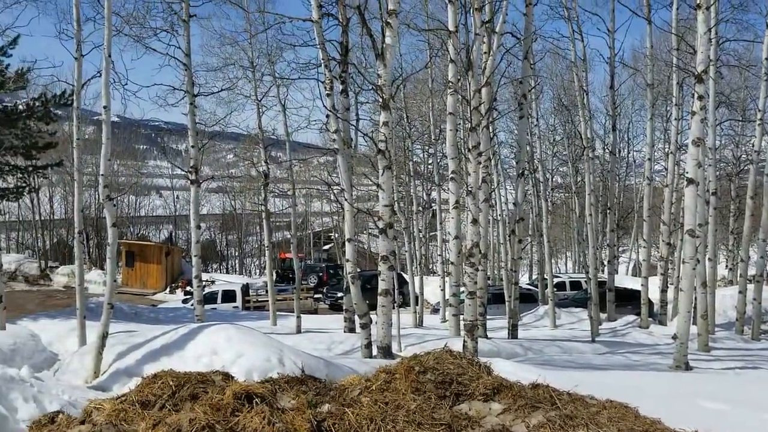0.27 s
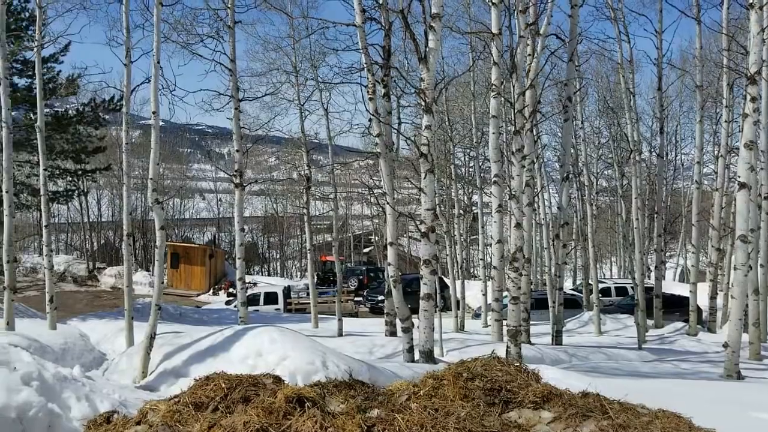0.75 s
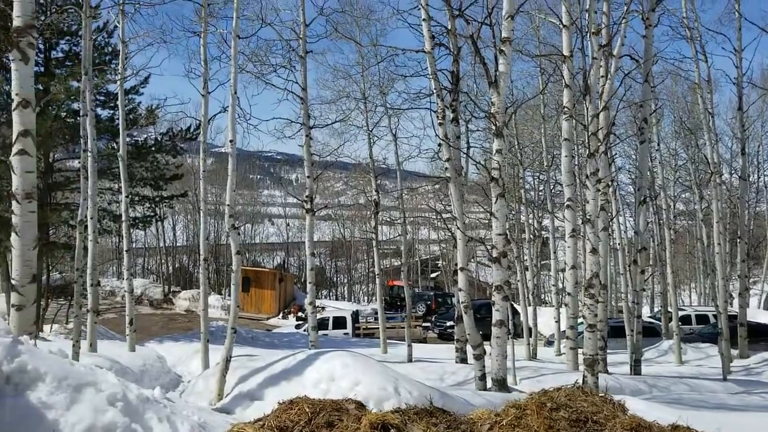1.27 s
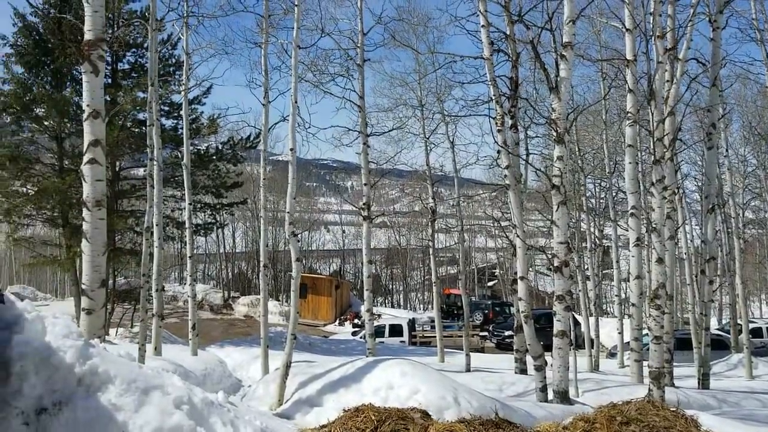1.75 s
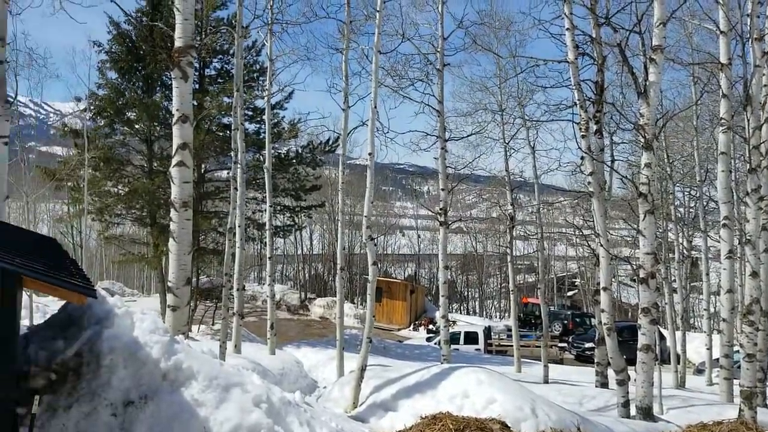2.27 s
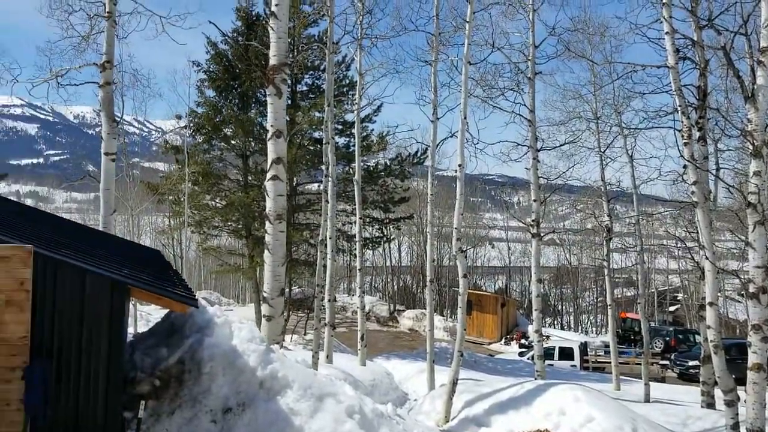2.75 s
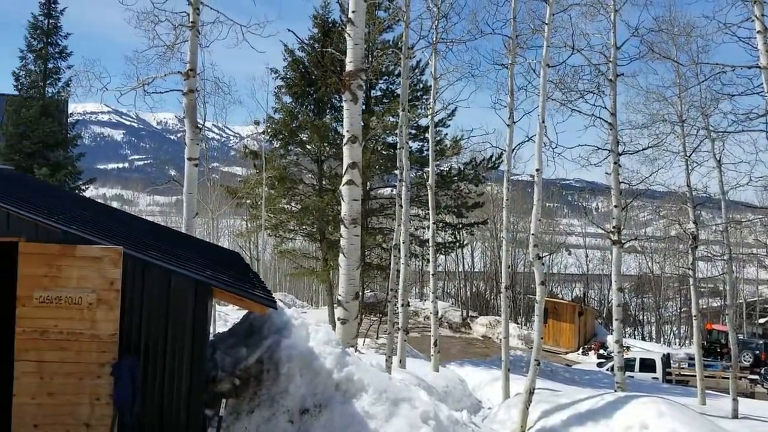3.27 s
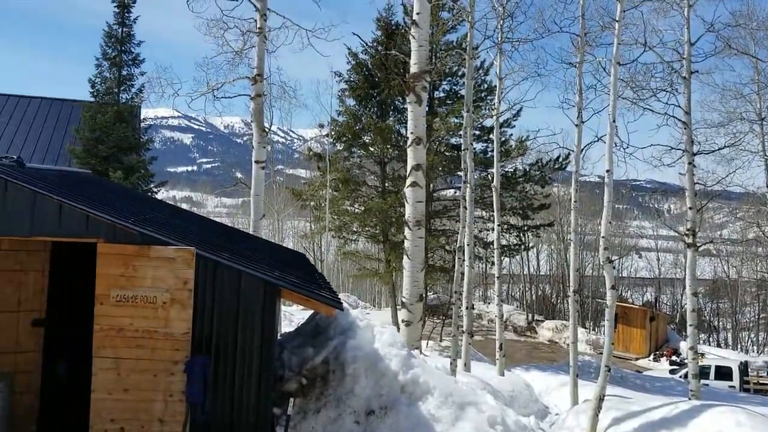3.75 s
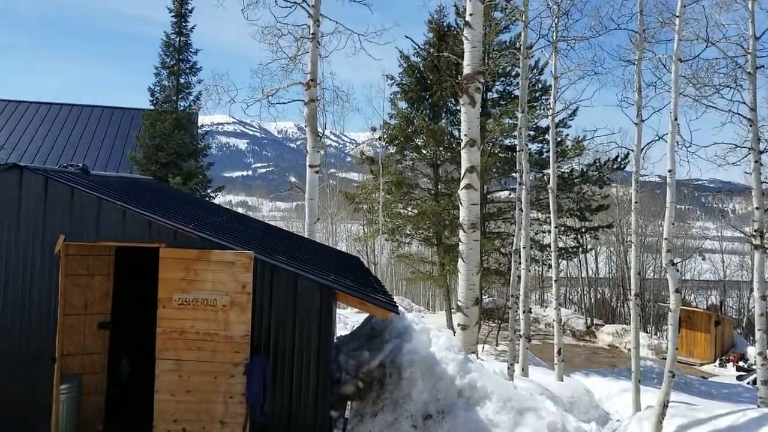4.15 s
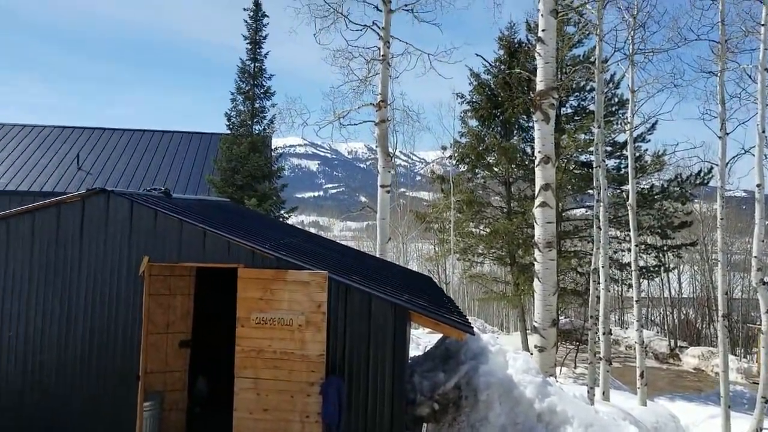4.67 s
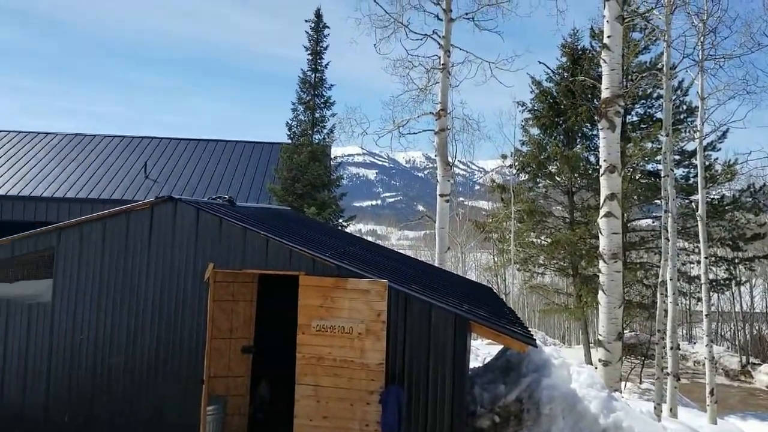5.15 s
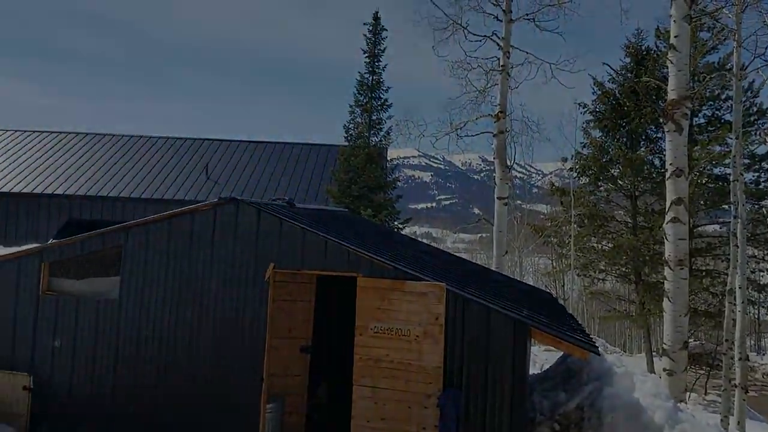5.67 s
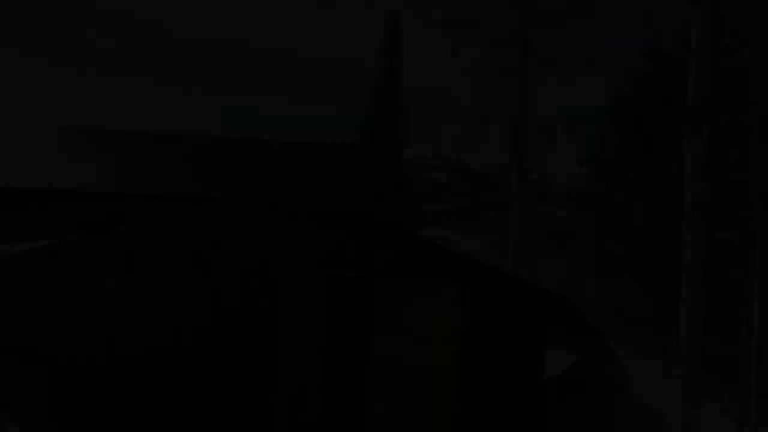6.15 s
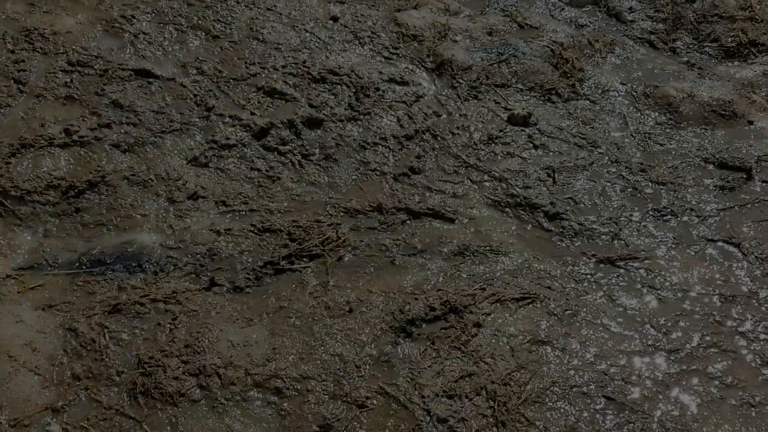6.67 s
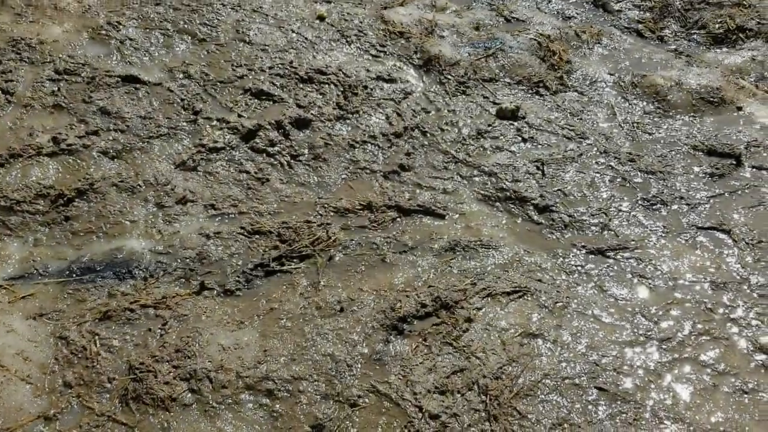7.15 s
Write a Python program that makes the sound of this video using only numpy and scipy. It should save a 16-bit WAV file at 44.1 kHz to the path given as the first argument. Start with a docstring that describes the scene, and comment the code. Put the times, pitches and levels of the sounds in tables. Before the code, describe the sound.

Low hen clucks and thin whines over faint straw ticks, one trembling rooster crow midway, a short dropout, then open-air clucks and a crunch left.

```python
"""Hens cluck and whine in a wooden shed: pulse trains through resonances, and near-pure gliding notes.
A young cock crows once as a trembling harmonic stack; noise grains make ticking straw and cracking crust.
Far hens mutter in flickering noise bands over air hiss and wind. After a short silence the clucks come from
the open, and a boot crunches on the left. Two microphone ports turn, so the hens' lag between them drifts."""
import sys
import numpy as np
from scipy import signal
from scipy.fft import rfft, irfft
from scipy.io import wavfile
from scipy.ndimage import uniform_filter1d, map_coordinates

SR = 44100
rng = np.random.default_rng(int(sys.argv[2]) if len(sys.argv) > 2 else 0)


def bounce(signal):
    """Save signal as a 16-bit WAV file at the path given by the first command-line argument."""
    frames = np.transpose(np.atleast_2d(signal))
    limited = np.clip(frames, -1, 1)
    pcm = np.round(limited * 32767).astype(np.int16)
    wavfile.write(sys.argv[1], SR, pcm)


N = 326781
TIME = np.arange(N) / SR
SILENCE_S = (6.108, 6.254)  # start, end


def undb(db):
    """Decibels to amplitude."""
    return 10 ** (np.asarray(db) / 20)


def unit(x):
    """Scale to RMS 1."""
    return x / np.sqrt(np.mean(x ** 2) + 1e-30)


def band(x, hz, width_hz):
    """Two-pole resonance, gain 1 at the centre."""
    return signal.lfilter(*signal.iirpeak(hz, hz / width_hz, fs=SR), x)


def shape(x, points):
    """Colour a sound by (hz, db) points."""
    hz, db = np.transpose(points)
    f = np.fft.rfftfreq(x.shape[-1], 1 / SR) + 1
    gain = undb(np.interp(np.log(f), np.log(hz), db))
    return irfft(rfft(x) * gain, x.shape[-1])


def walk(rate_hz, n=N):
    """Random levels held 1 / rate_hz and slewed twice; spread near 1."""
    hold = max(int(SR / rate_hz), 1)
    steps = np.repeat(rng.standard_normal(n // hold + 1), hold)[:n]
    return 1.4 * uniform_filter1d(uniform_filter1d(steps, hold), hold)


def read(table, fade_s=0.0024):
    """Samples covered by a curve, its columns there, and soft ends."""
    s, *columns = np.transpose(table)
    at = np.arange(int(s[0] * SR), min(int(s[-1] * SR), N))
    to_edge_s = np.minimum(at / SR - s[0], s[-1] - at / SR)
    return at, [np.interp(at / SR, s, c) for c in columns], np.clip(to_edge_s / fade_s, 0, 1)


# spectral density of the yard, relative: pitch_hz, density_db_per_hz
YARD = [(15, -39), (25, -3.5), (165, 1), (437, -2), (834, -1.5), (1430, 0), (1870, -3.5), (2460, -7.5),
        (4210, -1), (7220, -27), (12700, -40.5), (15800, 9)]
# flock murmur: time_s, level_db
MURMUR = [(0, -47), (.15, -78), (.36, -50.5), (.45, -45.5), (.6, -67), (2.2, -59.5), (3, -54), (3.62, -50),
          (3.78, -64), (6.1, -57.5), (6.26, -52.5), (6.8, -55), (7, -62.5), (7.41, -49)]
# wind, before the left port's extra 5 dB: time_s, level_db
WIND = [(0.0, -65.5), (1.2, -75), (2.2, -79.5), (6.2, -77.5), (6.6, -74), (7.0, -75), (7.41, -78)]
AIR_DB = -61


def yard():
    """Far hens mutter in narrow bands that swell together and flicker alone; air hisses, wind rumbles."""
    hz, db = np.transpose(YARD)
    hens, air, swell = 0, 0, walk(6.01)
    for f in 63 * 2 ** np.arange(0, 7.6, .5):
        density = undb(np.interp(np.log(f), np.log(hz), db))
        # rows: shared by both ports, left only, right only
        noise = density * band(band(rng.standard_normal((3, N)), f, f / 2), f, f / 2)
        if 100 < f < 2600:
            apart = np.clip(f / 3000, .15, 1)  # short waves differ between the ports
            heard = noise * np.array([[np.sqrt(1 - apart ** 2)], [apart], [apart]])
            hens = hens + undb(1.5 * swell + 4 * walk(25)) * band(heard, f, f)
        air = air + undb(1.5 * swell + 4.5 * walk(12)) * noise[1:]
    mutter = unit(ports(hens[0], HEN_TILT) + hens[1:])
    mutter = mutter * undb(np.interp(TIME, *np.transpose(MURMUR)))
    gusts_db = 2.1 * walk(3.54) + np.array([[5], [0]])  # left, right
    wind = unit(band(rng.standard_normal((2, N)), 49, 49)) * undb(gusts_db)
    return mutter + undb(AIR_DB) * unit(air) + wind * undb(np.interp(TIME, *np.transpose(WIND)))


# whines, squeaks, coos; pitches before the arch: start_s, length_ms, first_hz, last_hz, middle_db
WHINES = [(0.0, 100, 1775, 1796, -49.5), (0.225, 150, 1695, 2084, -52), (0.28, 78, 884, 694, -57),
          (0.376, 25, 1604, 1630, -36.5), (0.383, 32, 2105, 2130, -30.5), (0.685, 29, 1860, 1950, -45),
          (0.7, 18, 2130, 2600, -56), (1.728, 30, 3950, 3200, -54.5), (1.755, 29, 3050, 3930, -53),
          (1.298, 37, 2134, 1983, -43), (2.32, 97, 1787, 1760, -40.5), (2.742, 55, 2600, 2670, -59),
          (2.91, 40, 1910, 2560, -54.5), (2.996, 29, 905, 902, -45.5), (3.395, 38, 1086, 1410, -54),
          (3.415, 31, 1400, 1490, -38), (3.418, 36, 960, 1425, -41), (3.462, 19, 2290, 2330, -39.5),
          (3.497, 30, 1200, 934, -49), (3.522, 31, 1450, 1480, -40.5), (3.535, 22.5, 2640, 2910, -45.5),
          (3.578, 32.7, 1550, 1150, -43.5), (3.636, 15.5, 1006, 1080, -41.5), (3.844, 42, 865, 960, -52.5),
          (3.945, 55, 963, 972, -45.5), (6.255, 21, 1474, 1420, -45.5), (6.522, 20, 2160, 2010, -52.5),
          (6.54, 52, 1390, 1475, -51), (6.598, 39, 2074, 2120, -50.5), (6.705, 82, 2060, 1754, -52),
          (7.235, 81, 1480, 1420, -51), (7.265, 67, 814, 690, -56.5), (7.3, 135, 2030, 2087, -58),
          (7.332, 47, 419, 396, -52.5)]
WHINE_ENDS_DB = -18  # both ends against the middle
WHINE_ARCH_PER_S = 0.7  # fractional pitch drop at both ends, per second of length
WHINE_HOARSE = 0.33  # depth of the amplitude rasp
OCTAVE_DB, OCTAVE_SLOPE = 11, 0.9  # octave against note = base + slope x level


def whines(rows):
    """Near-pure notes, slightly unsteady, with a weak octave; each swells and fades as it glides."""
    out = np.zeros(N)
    for start_s, length_ms, first_hz, last_hz, middle_db in rows:
        length_s = length_ms / 1000
        at, (hz, off), edge = read([(start_s, first_hz, -1), (start_s + length_s, last_hz, 1)])
        db = middle_db + WHINE_ENDS_DB * np.abs(off) ** 3
        arch = 1 - WHINE_ARCH_PER_S * length_s * off ** 2
        phase = 2 * np.pi * np.cumsum(hz * (arch + 0.016 * walk(121.0, len(at)))) / SR
        note = np.sin(phase) + undb(OCTAVE_DB + OCTAVE_SLOPE * db) * np.sin(2 * phase)
        note = note * (1 + WHINE_HOARSE * walk(500, len(at)))
        out[at] += np.sqrt(2) * edge * undb(db + 1.2 * walk(90, len(at))) * note
    return out


FAR_WHINES, FAR_WHINE_HZ, FAR_WHINE_MS = 45, (700, 2100), (30, 110)  # count, ranges
FAR_WHINE_DB, FAR_WHINE_SPREAD_DB = -64, 4  # plus or minus the spread


def far_whines():
    """Rows for the faint whines of hens further back, at chance times and pitches."""
    when, length, pitch, glide, level = rng.random((FAR_WHINES, 5)).T
    low_hz, high_hz = FAR_WHINE_HZ
    start_s = when * (N / SR - .2)
    length_ms = np.interp(length, (0, 1), FAR_WHINE_MS)
    first_hz = low_hz * (high_hz / low_hz) ** pitch
    last_hz = first_hz * (.88 + .28 * glide)
    middle_db = FAR_WHINE_DB + FAR_WHINE_SPREAD_DB * (2 * level - 1)
    return np.transpose([start_s, length_ms, first_hz, last_hz, middle_db])


STRAW_PER_S, STRAW_HZ = 16, (3200, 4200, 6000)  # mean rate of each colour
STRAW_DB, STRAW_SPREAD_DB, STRAW_DECAY_S = -60.5, 10, 0.0043  # weakest hit, range above it


def straw():
    """Claws and straw tick faintly at chance moments, each size of stalk in its own colour."""
    out = 0
    for hz in STRAW_HZ:
        hits = rng.random(N) < STRAW_PER_S / SR
        hits = hits * undb(STRAW_DB + STRAW_SPREAD_DB * rng.random(N) ** 2)
        fade = signal.lfilter([1], [1, -np.exp(-1 / (STRAW_DECAY_S * SR))], hits)
        grain = unit(band(rng.standard_normal((2, N)), hz, hz / 2))
        out = out + band(fade * grain, hz, hz / 2)
    return out


# lone crust and twig ticks, before the port offsets: start_s, level_db
TICKS = [(0.188, -57), (0.383, -45.5), (0.861, -45.5), (1.1965, -57), (1.5363, -49.5), (2.3215, -53),
         (2.4683, -53), (2.541, -46.5), (3.028, -52), (3.1353, -43), (3.493, -49.5), (3.5577, -44),
         (3.5865, -49), (4.344, -52), (5.6171, -47), (6.254, -60), (6.512, -48.5), (6.791, -39),
         (7.341, -53)]
CRUNCH_S, CRUNCH_SPAN_S = 6.7, (6.55, 6.9)  # peak; start, end
CRUNCH_DB, CRUNCH_RISE_DB_S, CRUNCH_FALL_DB_S = -57.5, 188, 200  # level before port offsets


def boots():
    """Crust breaks in dense tiny cracks near the left port, and in lone ticks."""
    at = np.arange(int(CRUNCH_SPAN_S[0] * SR), int(CRUNCH_SPAN_S[1] * SR))
    late_s = at / SR - CRUNCH_S
    db = CRUNCH_DB + np.where(late_s < 0, CRUNCH_RISE_DB_S, -CRUNCH_FALL_DB_S) * late_s
    grains = rng.standard_normal((2, len(at))) * undb(2.0 * rng.exponential(size=(2, len(at))))
    cracks = unit(band(grains, 5300, 4400) + band(grains, 12000, 5500))
    out = np.zeros((2, N))
    out[:, at] = cracks * undb(db + np.array([[5], [-9]]))  # left, right
    t = np.arange(400) / SR
    for start_s, level_db in TICKS:
        tick = band(rng.standard_normal(len(t)), 4300, 15000) * np.exp(-t / 0.0037)
        i = int(start_s * SR)
        out[:, i:i + len(t)] += tick / np.abs(tick).max() * undb(level_db + np.array([[5], [-8]]))
    return out


# start_s, length_ms, pitch_hz, chest_db, beak_hz, beak_opening_db (above chest), roughness (0-1)
CLUCKS = [(0.404, 66, 253.8, -57.5, 1730, 12.5, 0.7), (0.419, 50.5, 269.7, -44.5, 1110, -1, 0.33),
          (0.741, 38.4, 289.4, -47, 1590, 6.5, 0.36), (0.853, 13.3, 216.6, -45, 1850, 5, 0.67),
          (0.896, 47, 243, -44.5, 1600, 7, 0.49), (0.969, 27.4, 219.5, -47, 1860, -5.5, 0.66),
          (1.045, 12.7, 188, -47, 1710, 4.5, 0.48), (1.066, 30, 241, -52.5, 1820, -15, 0.37),
          (1.306, 33, 247.5, -73, 1890, 31.5, 0.4), (1.342, 33, 223.1, -43.5, 1650, 8.5, 0.66),
          (1.386, 48, 229.6, -46.5, 1870, -36, 0.7), (1.467, 14.7, 212, -43, 1650, 4, 0.34),
          (1.554, 23, 259.6, -52, 1840, -6, 0.4), (1.654, 16.7, 215.7, -43.5, 1660, 3, 0.48),
          (1.737, 31, 224.3, -70, 2250, 18.5, 0.56), (1.79, 48.7, 271.2, -46, 1740, 11, 0.38),
          (1.825, 47, 251, -45, 1860, -3, 0.4), (1.907, 23, 206.4, -46.5, 1200, -4, 0.4),
          (1.937, 29.4, 246.3, -44, 1720, 9, 0.49), (2.087, 9.7, 205.2, -46.5, 1280, -14, 0.37),
          (2.283, 21.3, 203, -51, 1170, -38, 0.52), (2.478, 32.3, 259.2, -43.5, 1990, 7.5, 0.45),
          (2.532, 76, 239.9, -40, 1290, 0, 0.36), (2.719, 32.7, 222.3, -46.5, 2020, 3, 0.31),
          (2.949, 49, 288.4, -48.5, 1140, -1, 0.29), (3.04, 28.5, 328, -48.5, 1050, -3, 0.58),
          (3.07, 51, 260.6, -45.5, 1200, 0.5, 0.52), (3.183, 26, 323.5, -46.5, 2350, -1, 0.75),
          (3.306, 26, 213.8, -45.5, 1290, 1.5, 0.34), (3.414, 42.6, 298.6, -45, 1370, 3, 0.4),
          (3.457, 43, 197.4, -48.5, 2500, -12, 0.8), (3.581, 24, 261, -48.5, 1350, 3, 0.74),
          (3.631, 32.5, 213.3, -46, 1540, -0.5, 0.59), (3.896, 22.7, 206, -50, 1440, 10, 0.45),
          (4.004, 56, 203.6, -46.5, 1340, -1, 0.66), (4.206, 22, 230.6, -46.5, 1300, -5, 0.76),
          (4.292, 28.4, 292.6, -44.5, 1320, -1, 0.33), (4.395, 40, 331.4, -46.5, 1310, -2.5, 0.54),
          (4.554, 35, 191.6, -44, 1630, -7, 0.74), (4.63, 27, 214, -52, 1300, -10.5, 0.54),
          (5.056, 12.7, 191.3, -46, 1595, 6, 0.7), (5.139, 37, 331, -46.5, 1540, 13, 0.35),
          (5.42, 87, 280, -47.5, 1540, 8, 0.22), (5.608, 31.4, 277.3, -44, 1340, 7.5, 0.48),
          (5.713, 68, 254.3, -41.5, 1110, -1, 0.31), (5.815, 41.4, 190, -43, 1564, 14, 0.75),
          (6.049, 52, 267.2, -44, 1320, 6, 0.19), (6.368, 35.6, 246.1, -42.5, 2100, -9, 0.58),
          (6.4, 18.2, 262.8, -37, 1240, -2.5, 0.4), (6.441, 32, 194, -50.5, 1560, -22, 0.8),
          (6.562, 16.3, 186, -45.5, 1940, -11, 0.29), (6.64, 132, 241.4, -49, 1530, -2.5, 0.7),
          (6.707, 30, 201, -57, 2350, -4, 0.3), (6.774, 11.6, 204.2, -38, 1800, -9, 0.47),
          (6.783, 67, 209.7, -48, 1830, -7.5, 0.7), (6.857, 38, 276, -50.5, 1390, -10, 0.81),
          (6.996, 8.9, 336, -52, 1100, -25, 0.2), (7.05, 35, 266.2, -35.5, 1240, -3.5, 0.19),
          (7.151, 32.7, 290.2, -40, 1444, -0.5, 0.24), (7.2, 28.6, 250.2, -36, 1610, 1, 0.35),
          (7.285, 11.5, 231.4, -51.5, 2000, -2, 0.59)]
RISE_SHARE = 0.55  # of a cluck's length
WINDPIPE, RASP, BEAK_WIDTH_HZ = (750, 340), (4010, 1000), 430  # (centre_hz, width_hz)
# level above chest = base + slope x beak opening; less of both in the open
PIPE_DB, PIPE_SLOPE, PIPE_OUTSIDE_DB = -2, 0.11, -14.5
RASP_DB, RASP_SLOPE, RASP_ROUGH_DB, RASP_OUTSIDE_DB = -21.5, 0.97, 12.5, -26
UPPER_RATIO, UPPER_WIDTH_HZ, UPPER_DB = 2.2, 700, -11  # second beak resonance against the first
DULLER_FROM_S, DULLER_DB = 4.0, -5  # less treble in later clucks


def clucks():
    """Membrane pulses sagging in pitch, with a puff of air each cycle, ring chest, windpipe and beak."""
    out = np.zeros(N + SR)
    before = 4000  # samples ahead of each peak
    t = np.arange(-before, 5000) / SR
    for start_s, length_ms, hz, chest_db, beak_hz, beak_db, rough in CLUCKS:
        rough = np.clip(rough, 0, 1)
        rise_ms, fall_ms = RISE_SHARE * length_ms, (1 - RISE_SHARE) * length_ms
        outside = start_s > SILENCE_S[1]
        dull_db = DULLER_DB * (start_s > DULLER_FROM_S)
        pipe_db = PIPE_DB + PIPE_SLOPE * beak_db + PIPE_OUTSIDE_DB * outside
        rasp_db = RASP_DB + RASP_SLOPE * beak_db + RASP_ROUGH_DB * rough
        rasp_db += RASP_OUTSIDE_DB * outside + dull_db
        # -8 dB at start_s and at start_s + length_ms
        off = np.abs(1000 * t / np.where(t < 0, rise_ms, fall_ms))
        swell = undb(-8 * off ** np.where(t < 0, 3.5, 3))
        pitch = hz * (1 - .8 * t + 0.075 * rough * walk(150, len(t)))
        phase = np.cumsum(pitch) / SR + rng.random()
        pulses = unit(np.diff(phase % 1, prepend=0)) * undb(6 * rough * walk(hz, len(t)))
        air = rng.standard_normal(len(t)) * np.exp(-(phase % 1) / .35)
        buzz = (1 - rough) * pulses + 0.27 * rough * unit(air)
        chest = np.sin(2 * np.pi * phase) + 1.47 * rough * unit(band(air, 308, 360))
        voice = unit(chest)
        resonances = ((*WINDPIPE, pipe_db), (beak_hz, BEAK_WIDTH_HZ, beak_db), (*RASP, rasp_db),
                      (UPPER_RATIO * beak_hz, UPPER_WIDTH_HZ, beak_db + UPPER_DB + dull_db))
        for f, width_hz, db in resonances:
            voice = voice + undb(db) * unit(band(band(buzz, f, width_hz), f, 1.3 * width_hz))
        i = int((start_s + rise_ms / 1000) * SR) - before
        out[i:i + len(t)] += undb(chest_db) * swell * voice
    # feathers and straw swallow the top
    return signal.sosfilt(signal.butter(4, 6300, fs=SR, output="sos"), out[:N])


# one curve between clucks, one under the crow: time_s, pitch_hz, level_db
WARBLES = [
    [(2.595, 1290, -45), (2.64, 1480, -52.5), (2.67, 1610, -41), (2.685, 1480, -45), (2.708, 1080, -53)],
    [(4.7, 1170, -72.5), (4.706, 1184, -48), (4.724, 1400, -44.5), (4.734, 1423, -30), (4.742, 1387, -53),
     (4.75, 1270, -35.5), (4.758, 1342, -43.5), (4.786, 1437, -39), (4.834, 1230, -37), (4.848, 1355, -35),
     (4.872, 1327, -37.5), (4.888, 1165, -37.5), (4.9, 1150, -63)],
]


def warble():
    """Hens sing clear wavering notes with a weak octave."""
    out = np.zeros(N)
    for table in WARBLES:
        at, (hz, db), edge = read(table)
        phase = 2 * np.pi * np.cumsum(uniform_filter1d(hz, 300)) / SR
        note = (np.sin(phase) + .07 * np.sin(2 * phase)) * (1 + WHINE_HOARSE * walk(500, len(at)))
        out[at] = np.sqrt(2) * edge * undb(db) * note
    return out


# one curve per syllable: time_s, pitch_hz, partial_1_db, partial_2_db
CROW = [
    [(4.068, 917, -57, -66), (4.085, 1011, -42, -48), (4.12, 982, -36, -45), (4.165, 988, -50, -46)],
    [(4.135, 694, -77, -35), (4.15, 681, -36, -36), (4.25, 721.4, -44, -31.5), (4.275, 717, -50, -45.5),
     (4.31, 750, -47, -47)],
    [(4.338, 598, -52, -48), (4.347, 675, -29.5, -38), (4.355, 769, -42, -25), (4.375, 865, -32.5, -31),
     (4.387, 888.7, -30.5, -28.5), (4.429, 886.4, -28, -30), (4.465, 857, -37.5, -22.5),
     (4.505, 842.6, -30, -25.5), (4.533, 882, -30.5, -27), (4.7, 877, -33, -28.5),
     (4.745, 892.4, -28.5, -25.5), (4.86, 860.7, -35.5, -25), (4.91, 842, -24.5, -24.5),
     (4.99, 841.7, -25.5, -28), (5.03, 828.2, -35.5, -29.5), (5.08, 837, -40, -26.5),
     (5.14, 808.6, -31, -30.5), (5.283, 773.6, -40.5, -32.5)],
    [(5.275, 723, -31.5, -32), (5.335, 719.7, -32.5, -26), (5.4, 696, -31, -34.5),
     (5.45, 658.5, -29.5, -41.5), (5.49, 576, -37.5, -38.5), (5.53, 687, -46.5, -52.5),
     (5.59, 638, -54, -50.5)],
]
# overtone colour of syllables 1-2, 3 and 4: pitch_hz, level_db
CROW_OPENING = [(2100, -6.5), (2950, -2), (3800, -30), (5000, -7.5), (6500, -10.5), (8300, -26),
                (10500, -35), (13500, -23.5), (15500, -29)]
CROW_TOP = [(1900, -30), (2530, -14), (2625, 0), (3500, -23), (4350, -19), (5200, -11), (6100, -9),
            (7000, -17), (7900, -23), (8800, -23), (9600, -33), (10500, -27), (15500, -33)]
CROW_CLOSING = [(1900, 3), (2300, -15), (2800, -24), (3600, -14.5), (5500, -21.5), (8300, -29), (9600, -41),
                (15500, -40)]
# voice states, each held until the next: start_s, half_pitch_share, hoarseness (0-1), tremble_depth_hz
CROW_VOICE = [(4.06, .45, .15, 3), (4.14, .2, .26, 5), (4.33, .1, .3, 8), (4.385, .01, .08, 7),
              (4.89, 0, .015, 2), (5.14, .16, .09, 3), (5.275, .12, .17, 5), (5.375, .14, .3, 8)]
# overtones against the two low partials, one per state: level_db
CROW_OVER_DB = [-8.5, -9.5, -9, -9.5, -10.5, -12.5, -9, -9.5]
TREMBLE_HZ, CROW_JITTER_HZ = 40.44, 45  # mean rate; pitch scatter of a fully hoarse voice
VOICE_SLEW_S, CROW_LOW_HZ = 0.03, 497


def crow():
    """A trembling harmonic stack; strong-weak cycles add half lines, hoarseness smears each partial."""
    out = np.zeros(N)
    start_s, *voice = np.transpose(CROW_VOICE)
    state = np.maximum(np.searchsorted(start_s, TIME) - 1, 0)
    voice = np.array([*voice, CROW_OVER_DB], float)[:, state]
    voice = uniform_filter1d(voice, int(VOICE_SLEW_S * SR))
    for table, top in zip(CROW, (CROW_OPENING, CROW_OPENING, CROW_TOP, CROW_CLOSING)):
        at, (hz, db1, db2), edge = read(table)
        half, hoarse, tremble_hz, over_db = voice[:, at]
        top_hz, top_db = np.transpose(top)
        n = len(at)
        shake = np.sin(2 * np.pi * np.cumsum(TREMBLE_HZ * (1 + .3 * walk(30, n))) / SR)
        shake = shake * undb(1.5 * walk(25, n))
        pitch = hz + tremble_hz * (shake + 0.8 * walk(195.2, n)) + CROW_JITTER_HZ * hoarse * walk(700, n)
        phase = 2 * np.pi * np.cumsum(pitch) / SR
        over = 0
        for k in range(3, 24):
            db = np.interp(np.log(k * hz), np.log(top_hz), top_db) + 2.5 * walk(20, n) + 2.5 * walk(250, n)
            over = over + undb(db) * (k * hz < top_hz[-1]) * np.sin(k * phase + k ** 2)
        # the 2nd partial throbs in step with the tremble
        throb = 1 + .045 * tremble_hz * shake
        stack = np.sqrt(2) * (undb(db1) * np.sin(phase) + undb(db2) * throb * np.sin(2 * phase))
        stack += np.hypot(undb(db1), undb(db2)) * undb(over_db) * over
        out[at] += edge * stack * (1 + 2 * half * np.cos(phase / 2) + hoarse * walk(1200, n))
    # the throat passes little below the voice
    return signal.sosfilt(signal.butter(4, CROW_LOW_HZ, "high", fs=SR, output="sos"), out)


# pitch_hz, left_minus_right_db
COCK_TILT = [(60, -1.0), (200, 0), (700, 0), (1700, 2.5), (2670, 5), (3500, -3), (4400, -7), (5300, 0),
             (7000, 4), (8800, 20), (10500, 9), (15000, 5)]
# pitch_hz, left_lead_rad
COCK_LEAD = [(0, 0), (1380, 0.75), (2670, 2.6), (4910, 10.2), (5680, 15.5), (6370, 16.4), (7410, 12.2),
             (8270, 10.7), (8700, 11.9), (10700, 11.5), (13400, 17.2), (14400, 24.6), (15200, 26.5),
             (16000, 26.0)]
HEAD_SWAY_SAMPLES = 1.3  # typical lag between ports


def cock_ports(x):
    """Past the shed wall each band has its own level and lead at the ports; the head keeps moving."""
    f = np.fft.rfftfreq(N, 1 / SR)
    lead = np.exp(.5j * np.interp(f, *np.transpose(COCK_LEAD)))
    sway = HEAD_SWAY_SAMPLES / 2 * walk(12)
    out = []
    for side in (1, -1):  # left, right
        led = irfft(rfft(x) * lead ** side, N)
        moved = map_coordinates(led, [np.arange(N) + side * sway])
        out.append(shape(moved, [(hz, side * db / 2) for hz, db in COCK_TILT]))
    return np.array(out)


# first echoes: delay_ms, level_db
SHED_ECHO = [(5, -24), (13, -18), (23, -22)]


def planks(x):
    """First echoes inside the shed."""
    return x + sum(undb(db) * np.roll(x, int(ms * SR / 1000)) for ms, db in SHED_ECHO)


# turn of the ports: time_s, left_lag_samples
TURN = [(0, -18), (1.5, -16), (3, -10), (4.05, -7), (4.35, -2.2), (6.1, -2.2), (6.2, 17), (7.41, 17)]
# pitch_hz, left_minus_right_db
HEN_TILT = [(60, 1.5), (110, 1.0), (200, 1.0), (380, 0.0), (700, -1.5), (1290, -2.5), (2380, 0.0),
            (4400, 1.5), (8120, 4.5), (15000, 9.0)]


def ports(x, tilt):
    """The sound reaches one port first; the lag follows the turn of the ports."""
    lag = np.interp(TIME, *np.transpose(TURN)) / 2
    out = []
    for side in (1, -1):  # left, right
        moved = map_coordinates(x, [np.arange(N) - side * lag], order=3)
        out.append(shape(moved, [(hz, side * db / 2) for hz, db in tilt]))
    return np.array(out)


SHED_T60_S, SHED_DB, CROW_SHED_DB = 0.11, -12, -11


def shed(x, wet_db):
    """Plank walls send back a short dull tail; long waves reach both ports alike."""
    t = np.arange(int(.4 * SR)) / SR
    noise = rng.standard_normal((3, len(t)))
    tail = .6 * band(noise[0], 900, 900) + band(band(noise[1:], 2500, 3500), 2500, 3500)
    tail *= undb(-60 * t / SHED_T60_S) * (t > .008)
    tail = tail * undb(wet_db) / np.sqrt(np.sum(tail ** 2) / 2)
    return signal.fftconvolve(x[None], tail)[:, :N]


def scene():
    """Hens and cock reach the ports directly and by the shed; boots, straw and yard join them."""
    hens = whines(WHINES) + whines(far_whines()) + clucks() + warble()
    cock = crow()
    near = ports(planks(hens), HEN_TILT) + cock_ports(cock)
    return near + shed(hens, SHED_DB) + shed(cock, CROW_SHED_DB) + boots() + straw() + yard()


HISS_DB, TOP_HZ = -69.5, 15850


def record(dry):
    """The microphones add a wavering self-noise; the sound drops out once and its top is cut."""
    hiss = unit(band(rng.standard_normal((2, N)), 14100, 7800))
    dry = dry + undb(HISS_DB) * hiss * undb(0.96 * walk(3.2))
    on = np.clip(np.maximum(SILENCE_S[0] - TIME, TIME - SILENCE_S[1]) / 0.00051, 0, 1)
    return signal.sosfilt(signal.ellip(10, .2, 80, TOP_HZ, fs=SR, output="sos"), dry * on)


dry = scene()
out = record(dry)
bounce(out)
```